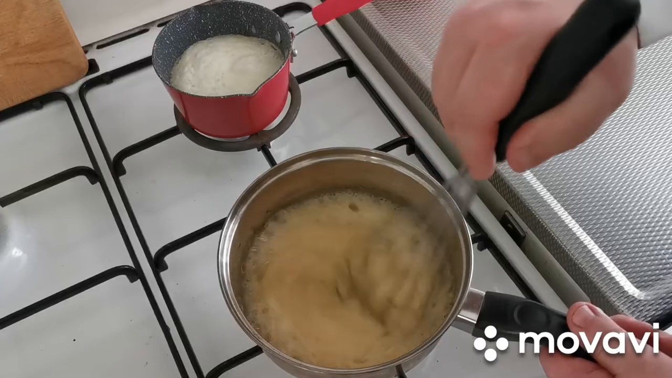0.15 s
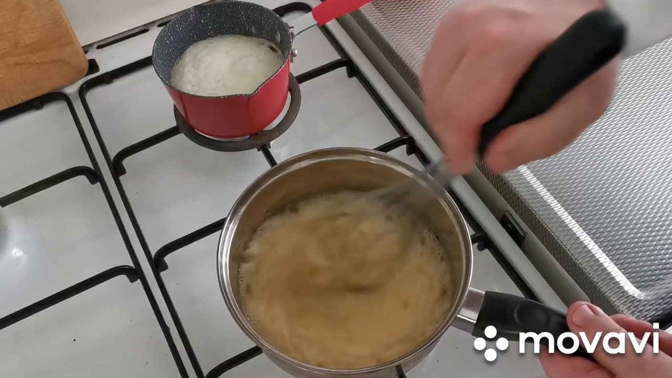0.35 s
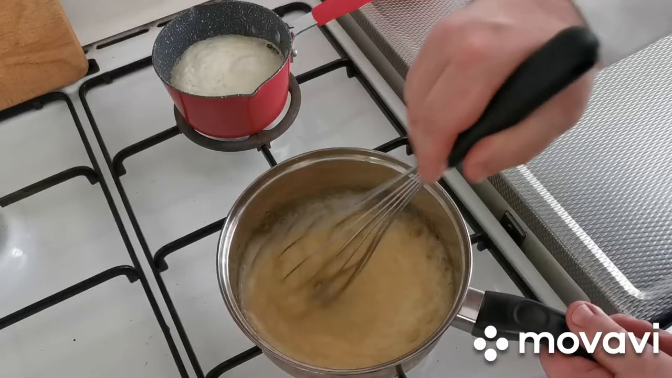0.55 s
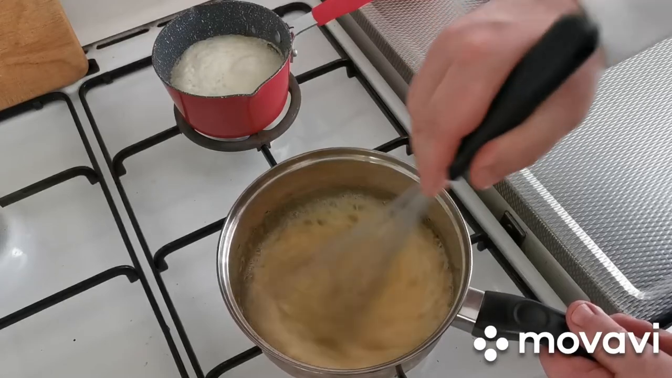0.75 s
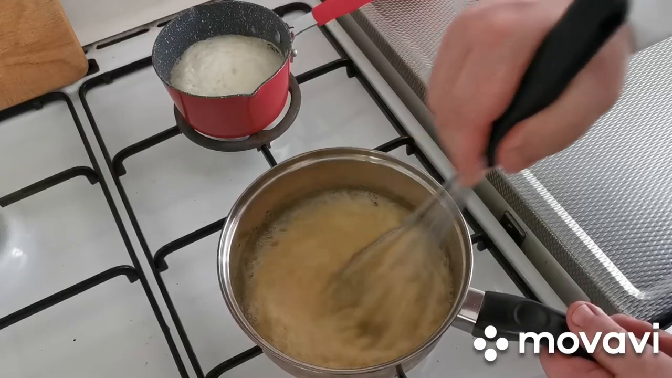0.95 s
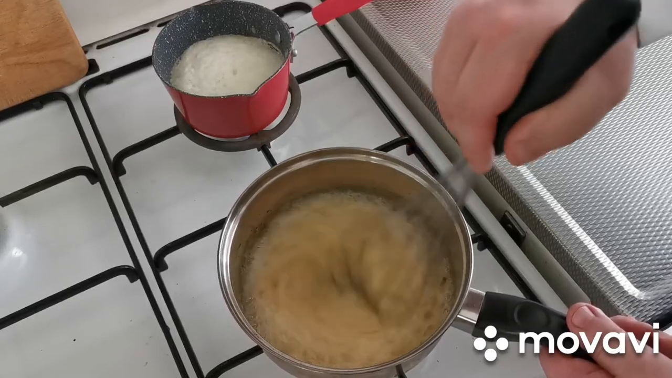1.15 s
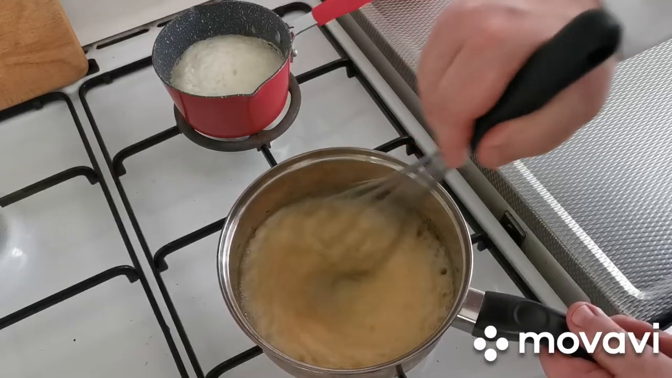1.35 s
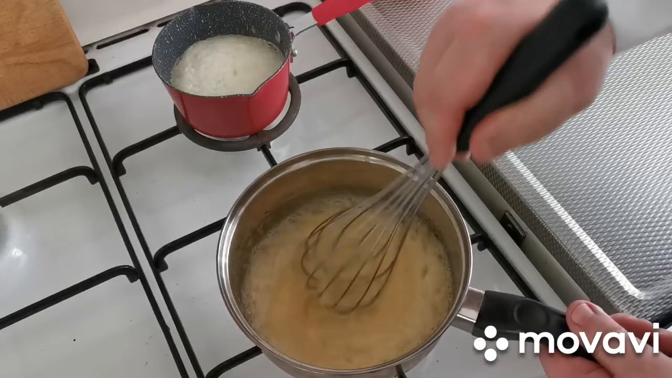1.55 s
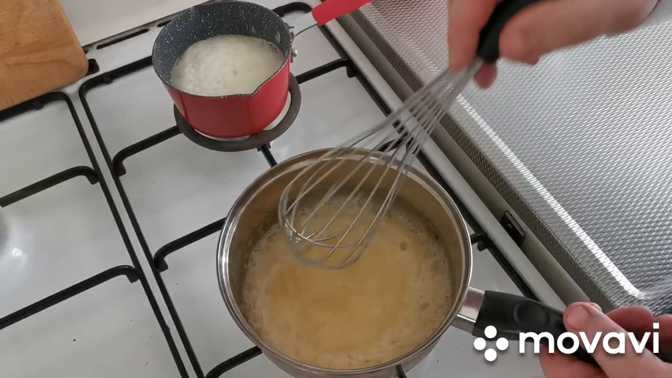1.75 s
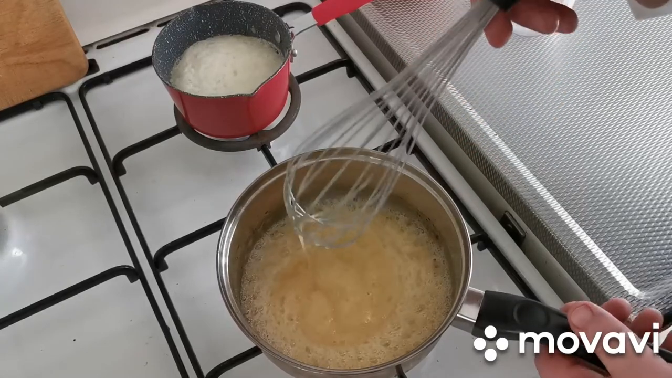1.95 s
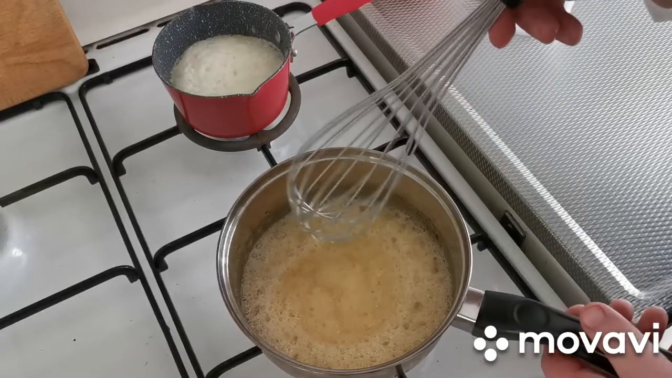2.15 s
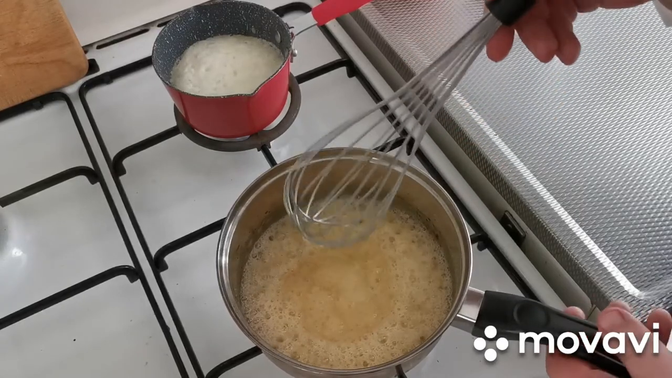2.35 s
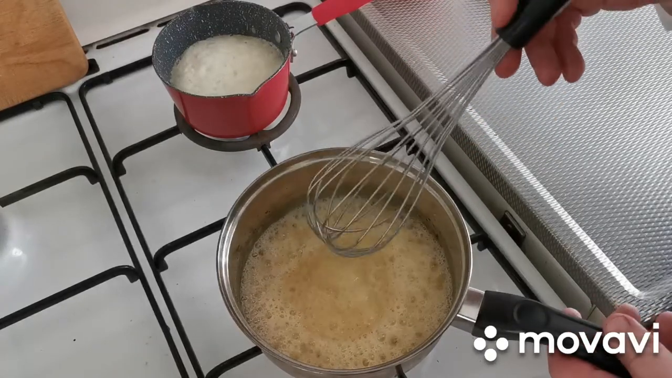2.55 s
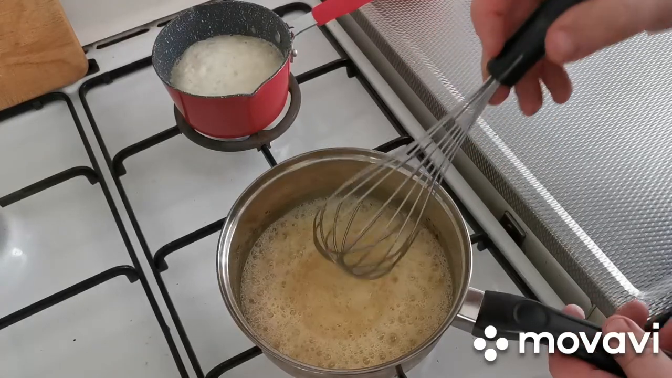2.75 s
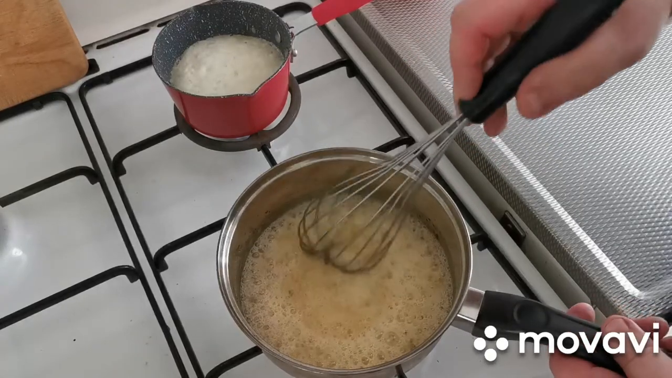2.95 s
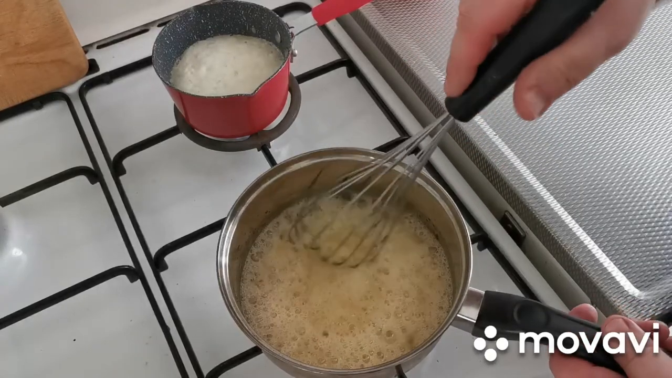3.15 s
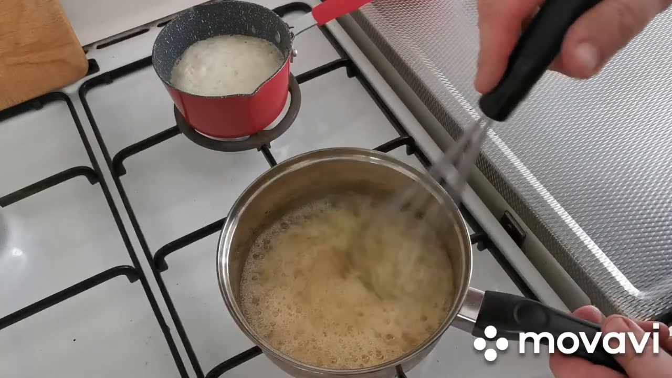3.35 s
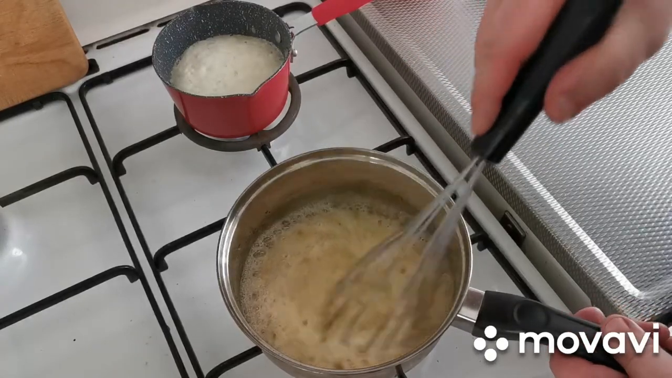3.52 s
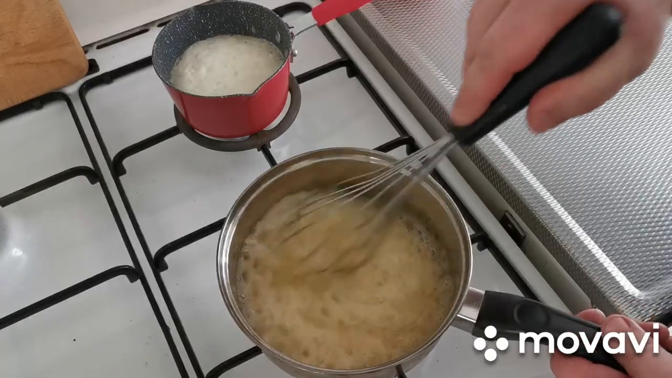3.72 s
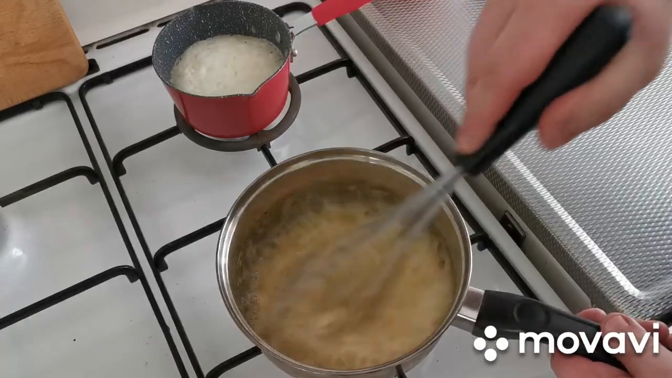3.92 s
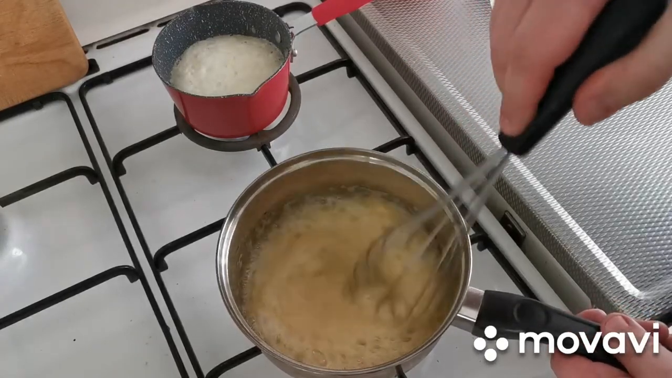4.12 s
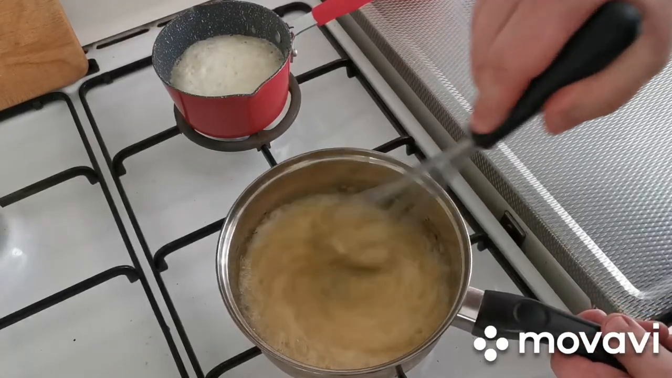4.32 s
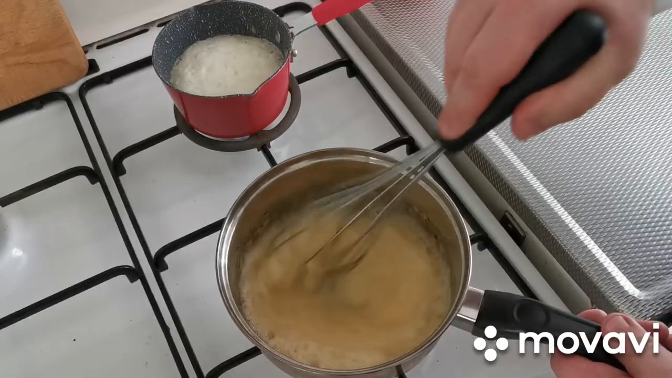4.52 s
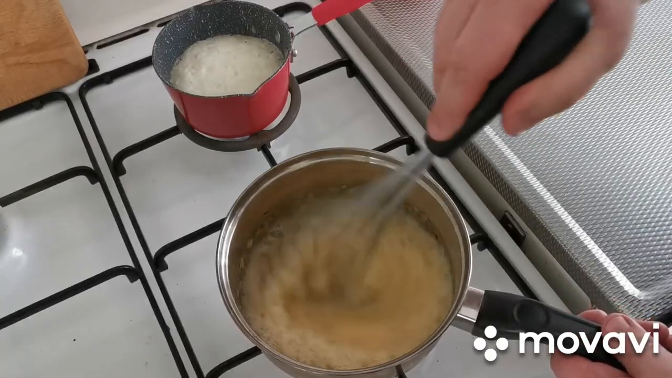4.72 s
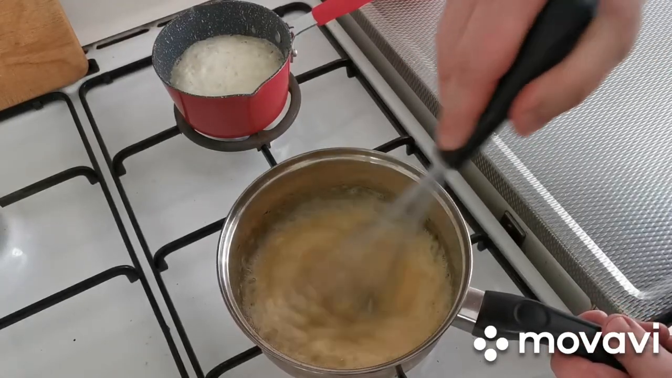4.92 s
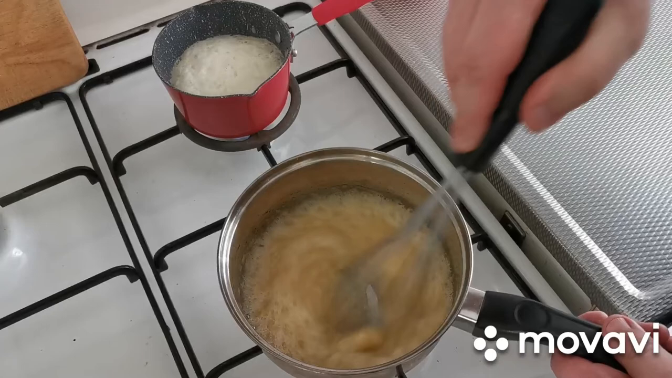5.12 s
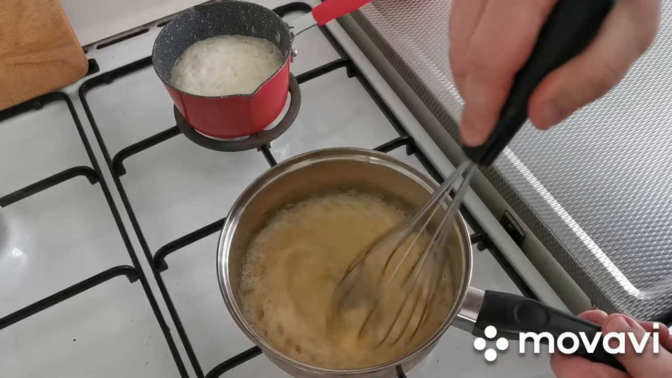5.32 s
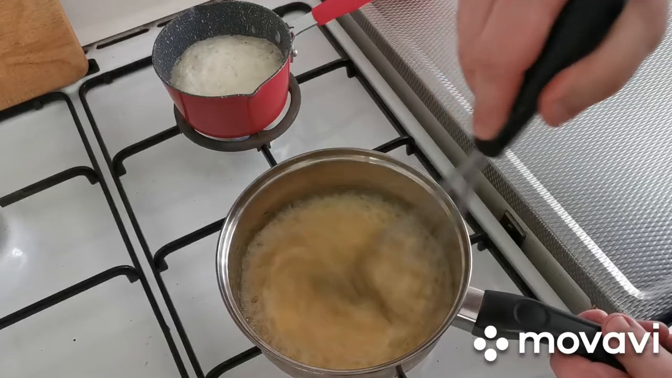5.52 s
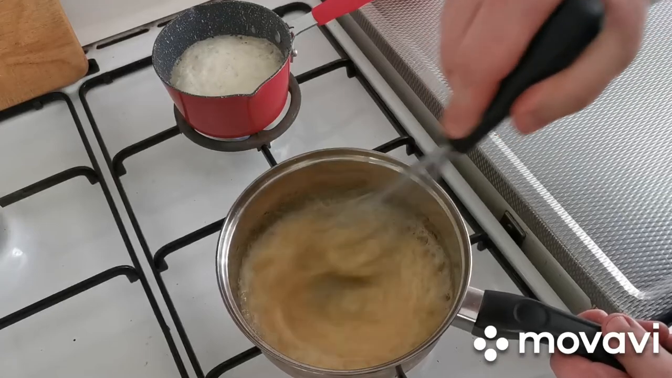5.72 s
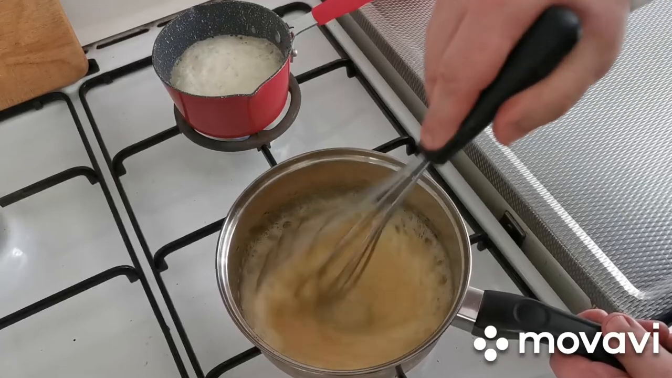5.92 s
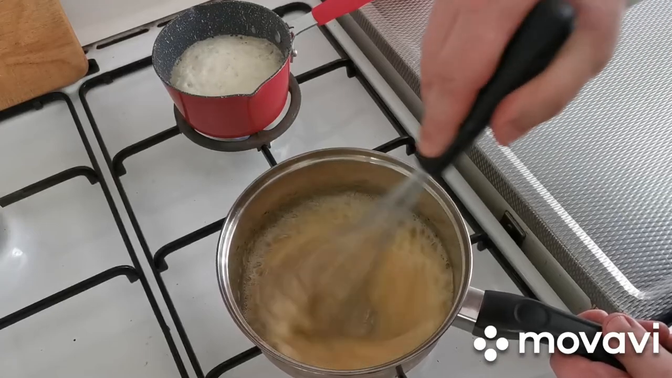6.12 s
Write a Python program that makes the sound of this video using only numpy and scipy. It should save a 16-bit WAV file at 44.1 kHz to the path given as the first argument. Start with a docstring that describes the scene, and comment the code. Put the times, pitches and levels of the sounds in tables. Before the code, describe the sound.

A close, dry stereo kitchen scene. Throughout, a gas ring hisses softly, hot caramel fizzes with fine crackle, and a faint wavering low hum and rumble lie underneath. From 0 to 1.7 seconds a wire whisk stirs a steel saucepan briskly, about four strokes a second: bright foamy swish, thick lumpy slosh, dull knocks and scrapes, with small metallic ticks and a firmer knock near 1.5. The whisk lifts out, and from about 1.8 to 3.4 only hiss and fizz remain, with faint taps near 2.5 and 3.1. At 3.5 wires clink lightly on the wall; stirring builds again from 3.7, with clinks at 3.9 and 4.2 and a crisp tick at 4.1. Strokes crowd together around 5.2 to 5.5, with a strong hollow knock at 5.3. Short ringing clinks follow at 5.65 and 5.9, then another solid pan knock at 6.0 as whisking continues to the end.

```python
"""A hissing gas ring, fizzing caramel and the swish of a wire whisk open the scene; the whisk stirs a
steel saucepan, is lifted out, then stirs again. Jet, fizz, swish and slosh are noise shaped in frequency;
low knocks, slaps and scrapes of the pan, short ticks and clinks on the wall excite damped modes of the metal.
A hum of wavering tones and a band of low rumble lie below. Two microphones colour the scene differently."""
import sys
import numpy as np
from scipy import signal
from scipy.fft import rfft, irfft
from scipy.io import wavfile

SR = 44100
rng = np.random.default_rng(int(sys.argv[2]) if len(sys.argv) > 2 else 0)


def generate_wav(signal):
    """Clip the signal to [-1, 1] and save it as 16-bit WAV at the path in sys.argv[1]."""
    frames = np.transpose(np.atleast_2d(signal))
    scaled = np.clip(frames, -1, 1) * 32767
    pcm = np.round(scaled).astype(np.int16)
    wavfile.write(sys.argv[1], SR, pcm)


N = 272097

# Gas jet resonances: f/Hz, width/Hz, relative level/dB
JET_RESONANCES = [(1794, 37, 4), (1926, 292, 0), (4610, 334, -4.5), (5160, 790, -14), (7017, 108, -3),
                  (8980, 1100, -13), (9140, 870, -4.5), (10200, 110, -3), (10650, 360, -2.5),
                  (12400, 700, -13)]
JET_DB = -51
# Steady fizz of the caramel over the flame's roar: f/Hz, relative level per Hz/dB
FIZZ_SPECTRUM = [(20, 2), (35, 1.5), (65, -6), (110, -9), (200, -9), (320, -8), (600, -6.5), (1200, -11.5),
                 (3000, -11.5), (6000, -12.5), (8500, -8.5), (11500, -6), (13800, -13.5), (15600, -10)]
FIZZ_DB = -53
# Hum tones: f/Hz, level/dB, pitch wander/Hz
HUM_TONES = [(49.4, -61.5, 1.46), (294.6, -76, 2.98), (344.3, -73, 1.63), (554, -74, 3.5)]
# Low rumble: t/s, level/dB
RUMBLE_LEVEL = [(0, -64.5), (.4, -58.5), (1.2, -64.5), (1.6, -59), (2.0, -65), (5.0, -67), (5.35, -61),
                (6.17, -65.5)]
# Edges of the rumble's band: lower f/Hz, upper f/Hz
RUMBLE_BAND = (80.4, 146)
# Wires moving through the foam: f/Hz, relative level per Hz/dB
SWISH_SPECTRUM = [(1290, -24), (2200, -2), (4270, -6), (4640, -4), (5420, -5), (6930, -7), (7710, -7),
                  (9310, 7), (11000, 5.5), (15600, -11)]
# Caramel pushed about: f/Hz, relative level per Hz/dB
SLOSH_SPECTRUM = [(60, -37), (110, -20), (200, -2.5), (480, 4), (650, 5.5), (900, 9), (1300, 3), (1800, 1),
                  (3000, -5)]
# Work of the whisk between strokes: t/s, swish level/dB, slosh level/dB
STEADY_WORK = [(0.0, -52, -53), (1.504, -52.5, -59.5), (1.748, -64.5, -75), (3.398, -77.5, -70),
               (3.699, -58, -62), (4.501, -53.5, -58.5), (5.196, -53.5, -61), (6.17, -54, -54.5)]
# Strokes round the pan, about four a second while stirring: middle t/s, swish level/dB, slosh level/dB
STROKES = [(.12, -52, -69), (.37, -50.5, -53), (.61, -48, -53.5), (.87, -49, -52), (1.1, -50.5, -56),
           (1.385, -46.5, -52.5), (1.613, -46.5, -50.5), (4.0, -50.5, -54), (4.24, -54, -77),
           (4.61, -49, -64), (4.84, -55, -52.5), (5.06, -53, -57), (5.199, -47.5, -51), (5.34, -48, -47.5),
           (5.538, -47.5, -51), (5.75, -49.5, -63), (6.1, -52.5, -75)]
STROKE_S = 0.05   # time from a stroke's middle to 1/e of its power
# Pan floor under the caramel: f/Hz, relative level/dB, t60 before extra damping/s
FLOOR_MODES = [(118, 5, 0.28), (168.4, -1.5, 0.27), (295, 1, 0.11), (404.5, 3, 0.16), (479.4, 7, 0.095),
               (660, 1.5, 0.13), (760.5, 6, 0.14), (897, 6.5, 0.08), (1008, 12.5, 0.042),
               (1173, 14.5, 0.059), (1338, 4, 0.1), (1790, 9, .05), (2064, 7, 0.095), (2480, 8.5, 0.062),
               (2703, 8, 0.051)]
PAN_RING_DB = 2   # strength of the pan floor's modes within the slosh
# Low knocks, slaps and scrapes of the pan: t/s, level of the crests/dB, length/s, fullest f/Hz
PAN_KNOCKS = [(0.196, -42, 0.002, 1110), (0.317, -47.5, 0.082, 875), (0.387, -45, 0.023, 483),
              (0.573, -57, 0.13, 870), (0.817, -47, 0.07, 880), (0.838, -43, 0.005, 1300),
              (1.066, -48.5, 0.039, 950), (1.322, -47, 0.11, 474), (1.566, -44, 0.051, 600),
              (1.577, -37, 0.037, 1080), (2.452, -52, 0.0036, 890), (3.072, -48, 0.01, 930),
              (3.487, -51, 0.017, 1350), (3.698, -50, 0.0084, 915), (3.896, -43.5, 0.05, 626),
              (4.612, -50, 0.026, 850), (4.892, -46, 0.011, 1030), (5.2005, -38, 0.0013, 2300),
              (5.287, -48, 0.01, 935), (5.31, -31, 0.0094, 1200), (5.312, -41.5, .01, 750),
              (5.328, -40, 0.0077, 746), (5.335, -43.5, 0.021, 400), (5.356, -39, 0.0058, 1200),
              (5.509, -43, 0.032, 780), (5.65, -49.5, 0.019, 950), (5.747, -48.5, 0.0065, 885),
              (5.841, -46, 0.016, 500), (6.008, -35.5, 0.01, 1140), (6.014, -37.5, .032, 750),
              (6.034, -43, .028, 397)]
# Pan wall and whisk wires: f/Hz, relative level/dB, t60 in units of the blow's t60
STEEL_MODES = [(2262, 8.5, 0.76), (2544, 0.5, 3.1), (3863, 5, 1.8), (4460, 0, 2.7), (5310, -11, 2.1),
               (5505, -9.5, 2.3), (5860, -10.5, 1.9), (6020, -12, 1.8), (6770, -10, 1.2),
               (7460, -0.5, 0.77), (8420, -1, 1.7), (8930, 1.5, 1.25), (9410, 3.5, 0.94), (9820, -0.5, 1.1),
               (10710, 7, 1.1), (10960, 4, 0.77), (11440, 4.5, 0.85), (12200, 3, 0.95), (13300, 3, 0.98),
               (15100, 10, 0.7)]
STRUCK_DB, STRUCK_REACH = 13.5, 0.016   # the struck wire's modes stand out: gain/dB, reach/octaves
# Short ticks of the wires, faint to sharp: t/s, level/dB, brightest f/Hz, t60/s
TICKS = [(0.8574, -39, 12000, 0.0035), (1.39, -44, 10820, 0.07), (1.516, -41, 9835, 0.075),
         (1.5319, -31, 9835, .035), (1.573, -42, 9410, 0.047), (1.582, -44, 10800, 0.12),
         (1.656, -38, 7380, 0.037), (4.1257, -22, 12900, 0.0041), (4.2435, -29, 15000, .004),
         (4.5005, -37, 11500, 0.0052), (4.634, -29, 12500, .004), (4.817, -35.5, 9360, 0.046),
         (4.8963, -33, 11000, 0.0053), (5.197, -39, 9020, 0.017), (5.288, -35.5, 9800, 0.009),
         (5.31, -34.5, 6820, 0.044), (5.436, -41.5, 9800, 0.061), (5.546, -32, 7000, 0.006),
         (5.788, -38, 6830, 0.037), (6.008, -35, 7000, 0.03)]
# Faint ticks at random: highest level/dB, downward spread/dB, middle f/Hz, scale of the t60/s
FAINT_TICKS = 40
FAINT_DB, FAINT_SPREAD_DB, FAINT_HZ, FAINT_T60_SCALE = -45, 6, 10000, 0.02
# Whisk on the wall: t/s, level/dB, brightest f/Hz, lower ring f/Hz, t60/s, low rattle level/dB,
# low rim tone level/dB, high rim tone level/dB (the last three relative to the blow)
CLINKS = [(3.483, -35, 11300, 7360, 0.075, 2, -47, -33), (3.4857, -33.5, 9120, 7414, 0.16, 0, -45, -40),
          (3.8869, -29, 9835, 5890, 0.14, 0, -47, -12), (3.908, -30, 10880, 6826, 0.11, -4.5, -45, -50),
          (4.2074, -32.5, 9835, 6040, 0.035, 1.5, -45, -45),
          (4.222, -30.5, 8950, 6020, 0.099, 1.5, -51, -40), (4.2271, -40, 10560, 5505, 0.11, 4, -47, -45),
          (5.653, -39, 7350, 6000, 0.069, 4.5, -38, -40), (5.658, -33.5, 9380, 5330, 0.1, -3, -16.5, -35),
          (5.892, -29.5, 9860, 6790, 0.12, 2, -47, -32), (5.9006, -34, 9410, 5360, 0.16, 5.5, -6, -18)]
# Long tones of the rim: f/Hz, t60/s, right side against left level/dB
RIM_TONES = [(3180, .6, -10), (4076, .55, 1)]
RIM_TWIN, RIM_BEAT_HZ = 0.34, 6.5   # a weaker twin close by makes each rim tone swell and sink
# Likeness of the two sides: f/Hz, correlation
LIKENESS = [(60, 0.57), (200, 0.78), (450, 0.61), (900, 0.26), (1500, 0.12), (16000, 0.065)]
# Right microphone against the left: f/Hz, level/dB
RIGHT_MIC = [(60, 0.5), (350, -0.5), (800, -9), (1450, -4), (2050, -11.5), (2700, -1.5), (5800, -2),
             (7200, 4.5), (8000, 1), (9000, -14.5), (10600, -16), (11500, -20), (13000, -9.5), (14000, -24),
             (15000, -18)]
CUTOFF_HZ = 15750


def amp(db):
    """Decibel law: the amplitude gain of a level in dB."""
    return 10 ** (np.asarray(db) / 20)


def rms_one(x):
    """Power normalisation: scales a signal to rms 1."""
    return x / np.sqrt(np.mean(x ** 2) + 1e-20)


def at_hz(points, hz):
    """Logarithmic pitch scale: interpolates a table along log frequency."""
    points = np.array(points)
    return np.interp(np.log(np.maximum(hz, 1)), np.log(points[:, 0]), points[:, 1])


def bins():
    """Discrete spectrum: the frequencies of a full-length transform."""
    return np.arange(N // 2 + 1) * SR / N


def drift(rate):
    """Slow random modulation: joins 2 * rate random values a second, with spread 1."""
    steps = rng.standard_normal(int(N / SR * rate * 2) + 3)
    return np.interp(np.arange(N) / SR * rate * 2, np.arange(len(steps)), steps) * np.sqrt(3 / 2)


def stereo(pair, gain):
    """Interaural coherence: mid and side mix into two sides, most alike in the bass; joint rms 1."""
    mid, side = rfft(pair)
    alike = np.clip(at_hz(LIKENESS, bins()), 0, 1)
    mid = np.sqrt(1 + alike) * mid
    side = np.sqrt(1 - alike) * side
    return rms_one(irfft(gain * np.array([mid + side, mid - side]), N))


def grains(per_s, spread_db):
    """Shot noise: two random click trains of uneven size."""
    sizes = amp(spread_db * np.minimum(rng.exponential(1, (2, N)), 5))
    signs = rng.choice([-1, 1], (2, N))
    return sizes * signs * (rng.random((2, N)) < per_s / SR)


def add(out, s, sound):
    """Superposition: mixes a short sound in at time s."""
    i = int(s * SR)
    out[:, i:i + sound.shape[1]] += sound[:, :N - i]


def fade(t, t60):
    """Exponential damping: the amplitude falls 60 dB in t60."""
    return np.exp(-np.log(1000) * t / t60)


def gas_jet():
    """Turbulence noise of a jet, filtered by the burner's resonances."""
    power = sum(amp(2 * db) / (1 + (2 * (bins() - hz) / width) ** 2) ** 2
                for hz, width, db in JET_RESONANCES)
    hiss = stereo(rng.standard_normal((2, N)), np.sqrt(power))
    return amp(JET_DB + 0.5 * drift(6.3)) * hiss


def caramel(crackle_db=-12):
    """Summed bubble bursts: countless small ones merge into noise, a few larger ones crackle in the treble."""
    colour = amp(at_hz(FIZZ_SPECTRUM, bins()))
    fizz = stereo(rng.standard_normal((2, N)), colour) * amp(1.2 * drift(10))
    pops = grains(300.0, 4.5) * amp(4 * drift(5))
    treble = bins() ** 2 / (bins() ** 2 + 1700.0 ** 2)
    crackle = stereo(pops, colour * treble)
    return amp(FIZZ_DB) * (fizz + amp(crackle_db) * crackle)


def hum(waver_db=2.2):
    """Frequency and amplitude modulation: a few low tones waver in pitch and level."""
    total = 0
    for hz, db, wander in HUM_TONES:
        phase = 2 * np.pi * np.cumsum(hz + wander * drift(6.6)) / SR
        total = total + amp(db + waver_db * drift(5.5)) * np.sin(phase)
    return np.sqrt(2) * total * np.ones((2, 1))   # equal on both sides


def effort():
    """Addition of powers: steady work plus a smooth swell per stroke gives the gains of swish and slosh."""
    t = np.arange(N) / SR
    s, *work_db = np.transpose(STEADY_WORK)
    power = np.array([amp(2 * np.interp(t, s, db)) for db in work_db])
    for middle, *db in STROKES:
        swell = np.exp(-((t - middle) / STROKE_S) ** 2)
        power += amp(2 * np.array(db))[:, None] * swell
    return np.sqrt(power)


def stirring(swish_gain, slosh_gain):
    """Filtered shot noise: wires burst foam in dense bright grains and push thick liquid in a lumpy low wash."""
    bursts = rms_one(grains(1200.0, 2.5)) * 0.7 + rng.standard_normal((2, N))
    swish = amp(2.0 * drift(30)) * stereo(bursts, amp(at_hz(SWISH_SPECTRUM, bins())))
    lumps = rms_one(grains(600.0, 1.95))
    # resonance curves whose widths follow from the modes' decay times
    modes = sum(1 / (1 + (np.pi * t60 * (bins() - hz) / np.log(1000)) ** 2) for hz, _, t60 in FLOOR_MODES)
    pan_ring = np.sqrt(1 + amp(2 * PAN_RING_DB) * modes)
    slosh = amp(2.96 * drift(25)) * stereo(lumps, amp(at_hz(SLOSH_SPECTRUM, bins())) * pan_ring)
    return swish_gain * swish + slosh_gain * slosh


def rumble():
    """Band-limited noise: a low rumble that rises and falls with its level curve."""
    s, db = np.transpose(RUMBLE_LEVEL)
    band = signal.butter(2, RUMBLE_BAND, "band", fs=SR, output="sos")
    noise = signal.sosfilt(band, rng.standard_normal(N))
    return amp(np.interp(np.arange(N) / SR, s, db)) * rms_one(noise)


def pan_knocks(slips_per_s=800.0, reach_octaves=0.36):
    """Impulsive excitation: a first impulse and uneven slips drive the floor modes, most near the fullest pitch."""
    out, t = np.zeros((2, N)), np.arange(int(0.3 * SR)) / SR
    hz, level_db, t60 = np.transpose(FLOOR_MODES)[:, :, None]
    for s, db, length, full_hz in PAN_KNOCKS:
        chance = rng.random((2, len(t)))
        slips = (chance[0] < slips_per_s / SR) * (2 * chance[1] - 1) ** 3
        slips = slips * np.exp(-(t / max(length, 0.001)) ** 4)
        slips[0] = 0.89   # first contact
        uneven_db = rng.normal(0, 2, hz.shape)
        damping = np.clip(length / 0.012, 0.3, 1)   # a quick slap leaves the wires pressed down, stopping the ring
        off_pitch_db = np.minimum(6 * (np.log2(hz / full_hz) / reach_octaves) ** 2, 10.0)
        strength = amp(level_db - off_pitch_db + uneven_db)
        # the two sides differ more for higher modes
        side_phase = rng.normal(0, 1.0, hz.shape) * hz / 1000 * [[[0]], [[1]]]
        phase = side_phase + rng.normal(0, 0.47, hz.shape)
        rings = strength * fade(t, t60 * damping) * np.sin(2 * np.pi * hz * t + phase)
        body = np.sum(rings, axis=1) * np.minimum(t / (0.002 * damping), 1)
        sound = signal.fftconvolve(body, slips[None], axes=1)
        crest = np.percentile(np.abs(sound[:, :int((length + 0.015) * SR)]), 95)
        add(out, s, amp(db) * sound / crest)
    return out


def blow(t, centre_hz, t60, rattle_db, lower_hz, reach_octaves=0.45, crack_db=-3, rough_hz=110.0, shake=0.65):
    """Modal impact: modes near the bright centre ring most; trembling wires keep touching and roughen each."""
    hz, level_db, share = np.transpose(STEEL_MODES)[:, :, None]
    near_db = np.maximum(-6 * (np.log2(hz / centre_hz) / reach_octaves) ** 2, -17.0)
    # the low rattle sets a floor between 5 and 7 kHz
    near_db = np.where((hz > 5000) & (hz < 7000), np.maximum(near_db, rattle_db), near_db)
    struck = [np.exp(-(np.log2(hz / f) / STRUCK_REACH) ** 2) for f in (centre_hz, lower_hz)]
    near_db = near_db + STRUCK_DB * np.maximum(*struck)
    strength = amp(level_db + near_db + rng.normal(0, 2, (2, *hz.shape)))

    slow = signal.butter(1, rough_hz, fs=SR, output="sos")
    tremble = signal.sosfilt(slow, rng.standard_normal((2, 2, len(hz), len(t))))
    # complex modulation shakes both level and phase
    tremble = 1 + shake * (tremble[0] + 1j * tremble[1]) * np.sqrt(SR / rough_hz / np.pi)
    phase = rng.uniform(0, 2 * np.pi, strength.shape)
    hz = hz * (1 + rng.normal(0, 0.003, hz.shape))   # each blow's modes are slightly detuned at random
    waves = np.imag(tremble * np.exp(2j * np.pi * hz * t + 1j * phase))
    rings = np.sum(strength * fade(t, share * t60) * waves, axis=1)

    edges_hz = [max(centre_hz * 0.45, 4800.0), min(centre_hz * 1.6, 19000)]
    band = signal.butter(3, edges_hz, "band", fs=SR, output="sos")
    crack = signal.sosfilt(band, rng.standard_normal((2, len(t))))
    crack = crack * (fade(t, t60 * 0.15) + fade(t, t60) / 5)
    onset = np.minimum(t / 0.0004, 1)
    # the wires knock again, unevenly
    knocks_db = rng.normal(0, 2.5, 48) * (np.arange(48) > 0)
    chatter = amp(np.interp(t * 150, np.arange(48), knocks_db))
    return (rings * 0.37 + amp(crack_db) * crack) * onset * chatter


def ticks(swish_gain):
    """Damped modal impact: short ticks of the wires, faint to sharp; the longer ones slide in softly."""
    out, chance = np.zeros((2, N)), rng.random((FAINT_TICKS, 4))
    share = np.cumsum(swish_gain ** 2)   # faint ticks fall most where the swish is strongest
    faint = []
    for a, b, c, d in chance:
        s = np.searchsorted(share, a * share[-1]) / SR
        faint.append((s, FAINT_DB - FAINT_SPREAD_DB * b, FAINT_HZ * 2 ** (c - 0.5), FAINT_T60_SCALE * (d + 0.14)))
    for s, db, centre_hz, t60 in TICKS + faint:
        t = np.arange(int(1.1 * t60 * SR)) / SR
        tick = blow(t, centre_hz, t60, -4.0, centre_hz)
        add(out, s, amp(db) * tick * np.minimum(t / (0.051 * t60), 1))
    return out


def clinks():
    """Modal impact with beating: a few blows also wake long rim tones, each at its listed level."""
    out, t = np.zeros((2, N)), np.arange(int(0.3 * SR)) / SR
    side_phase = [[0], [2]]
    for s, db, centre_hz, lower_hz, t60, rattle_db, *rim_db in CLINKS:
        sound = blow(t, centre_hz, t60, rattle_db, lower_hz)
        # the touching wires break up the rim tones
        waver = amp(np.interp(t, np.linspace(0, t[-1], 30), rng.normal(0, 3, 30)))
        for (hz, tone_t60, right_db), tone_db in zip(RIM_TONES, rim_db):
            main = np.sin(2 * np.pi * hz * t + side_phase)
            twin = np.sin(2 * np.pi * (hz + RIM_BEAT_HZ) * t + side_phase)
            gain = amp(tone_db + np.array([[0], [right_db]])) * fade(t, tone_t60)
            sound = sound + gain * (main - RIM_TWIN * twin) * np.minimum(t / 0.006, 1) * waver
        add(out, s, amp(db) * sound * np.cos(np.pi / 2 * t / t[-1]))
    return out


def scene():
    """Linear superposition: all sources add before the microphones colour them."""
    swish_gain, slosh_gain = effort()
    steady = gas_jet() + caramel() + hum()
    stirred = stirring(swish_gain, slosh_gain) + rumble()
    return steady + stirred + pan_knocks() + clinks() + ticks(swish_gain)


def record(dry):
    """Linear filtering: the right microphone, behind another port, has its own colour; the top is cut."""
    right = irfft(rfft(dry[1]) * amp(at_hz(RIGHT_MIC, bins())), N)
    top_cut = signal.ellip(12, 0.5, 55, CUTOFF_HZ, fs=SR, output="sos")
    return signal.sosfilt(top_cut, np.array([dry[0], right]))


dry = scene()
out = record(dry)
generate_wav(out)
```